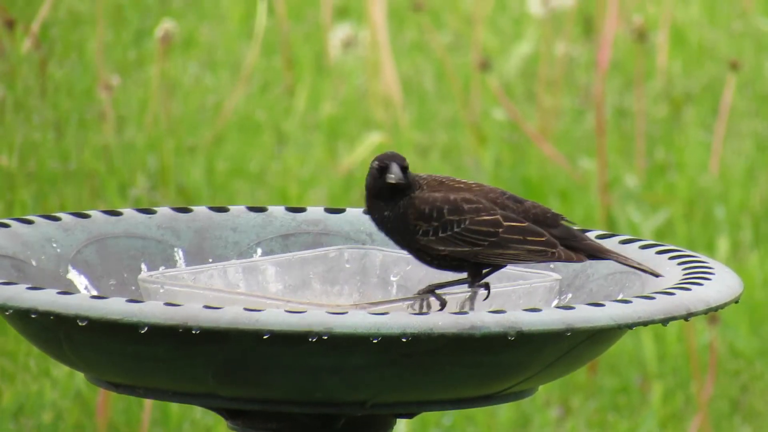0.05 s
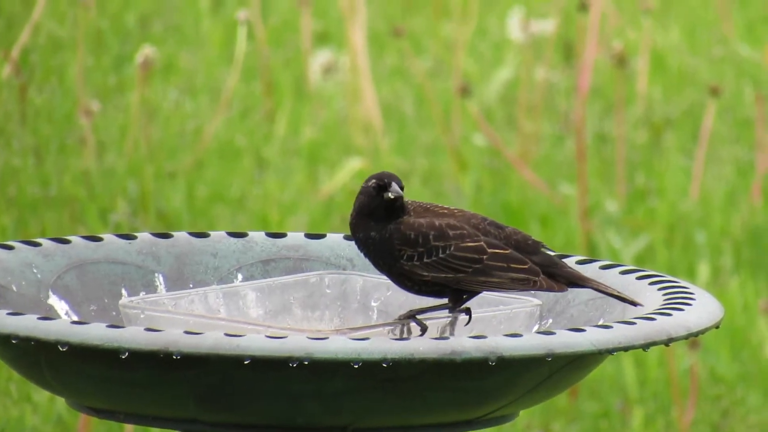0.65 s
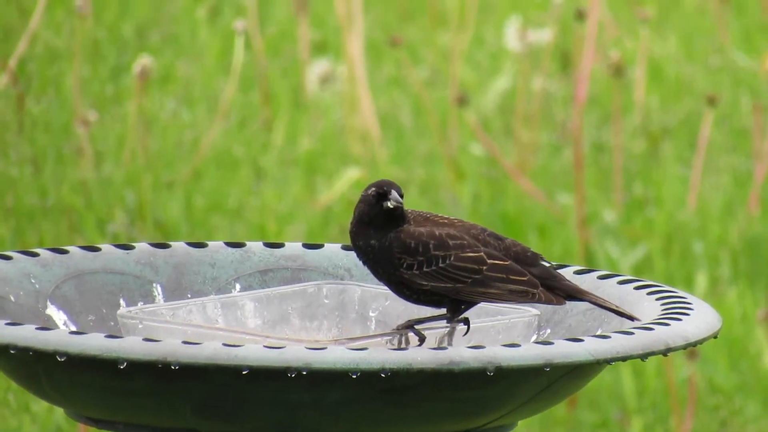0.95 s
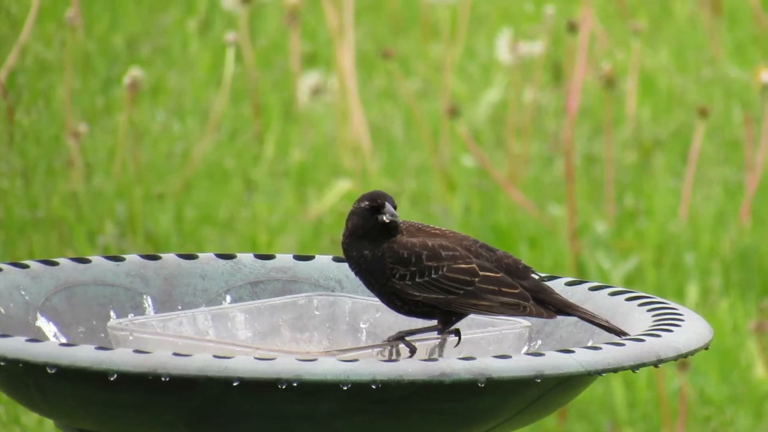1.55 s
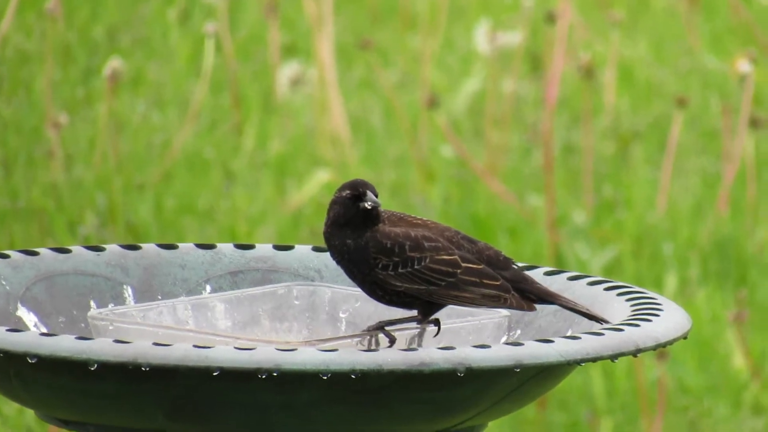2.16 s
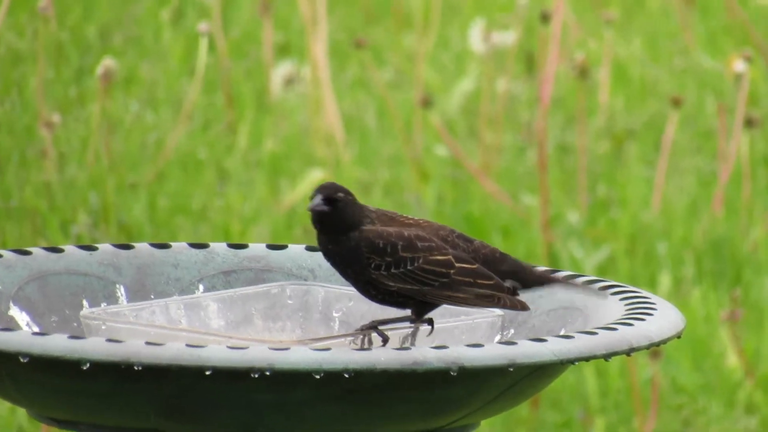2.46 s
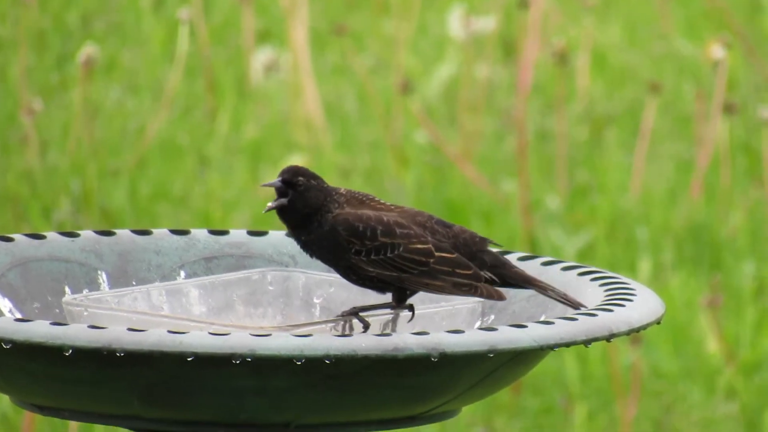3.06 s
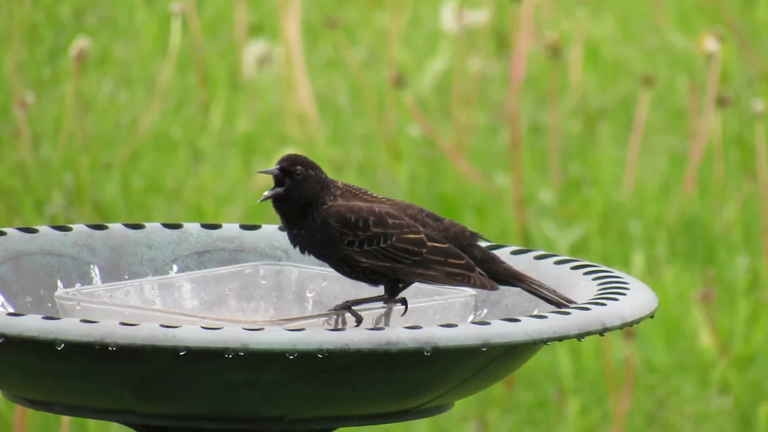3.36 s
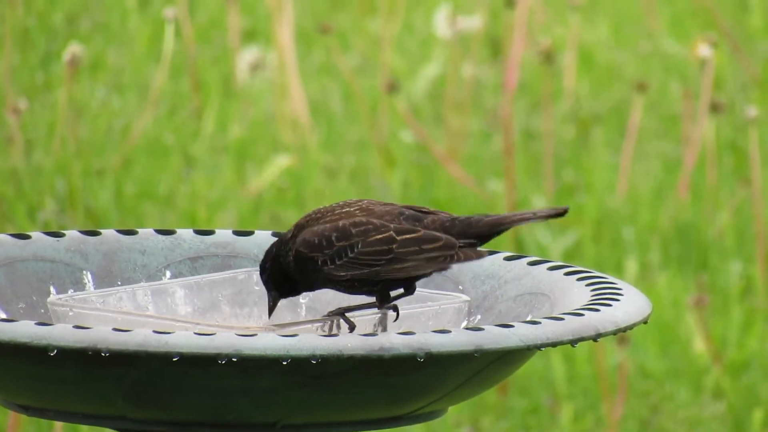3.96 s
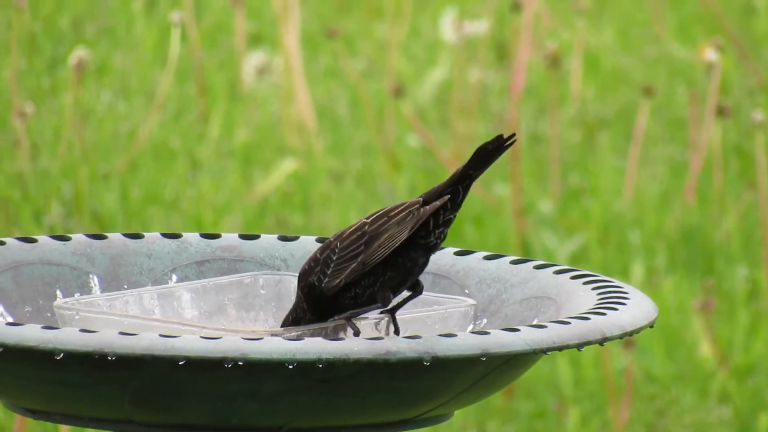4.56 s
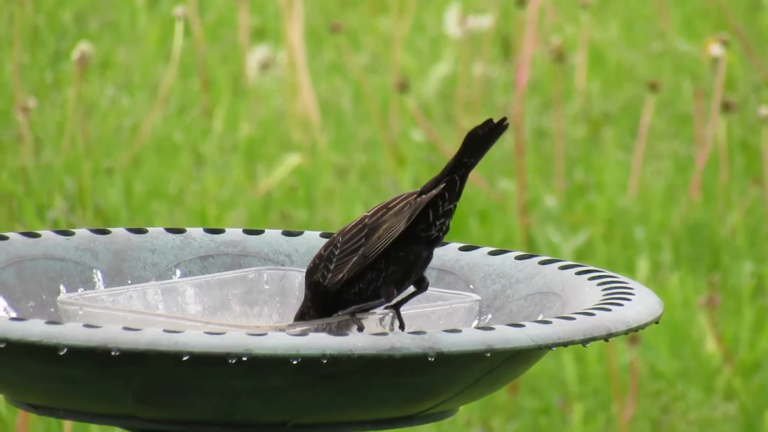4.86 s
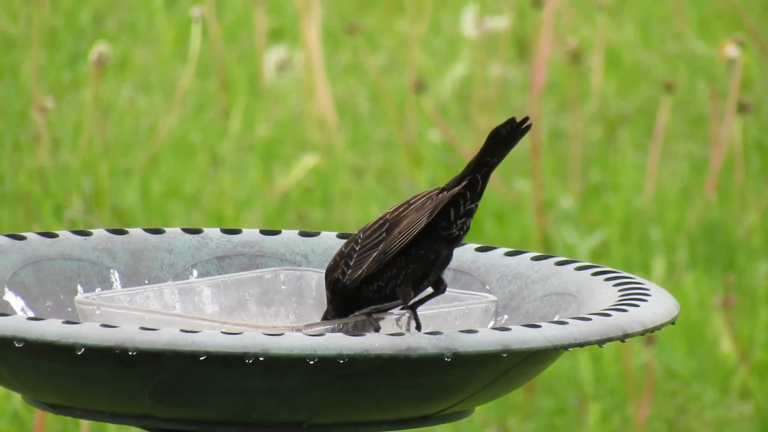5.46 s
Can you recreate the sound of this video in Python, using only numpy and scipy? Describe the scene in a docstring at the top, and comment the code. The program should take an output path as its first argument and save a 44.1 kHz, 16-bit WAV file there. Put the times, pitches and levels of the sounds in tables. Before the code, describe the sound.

Faint, thin chirps open over soft outdoor air while a far engine hums and swells. Then a blackbird on a bird bath, near the microphone, lets out a single high, buzzy whistle that falls and grows louder, finishing on a clean tone. Afterwards it dabbles very softly in the water as distant songbirds keep warbling in the garden trees.

```python
"""A garden with a bird bath. A distant engine drones and swells under a steady wash of outdoor air.
Songbirds warble and chip in the trees further off, and the garden echoes them.
On the bath a blackbird gives one loud whistle: its syrinx slides down in pitch while a fast flutter
makes it buzz, then the flutter stops and it ends on a pure note. Faint dabbles follow as it drinks."""
import sys
import numpy as np
from scipy import signal
from scipy.fft import rfft, irfft
from scipy.io import wavfile

SR = 44100
rng = np.random.default_rng(int(sys.argv[2]) if len(sys.argv) > 2 else 0)


def unload_wav(signal):
    """Save mono or channel-first audio to the path in sys.argv[1] as 16-bit WAV at rate SR, clipped to [-1, 1]."""
    wavfile.write(
        sys.argv[1],
        SR,
        np.round(np.clip(np.atleast_2d(signal).T, -1, 1) * 32767).astype(np.int16),
    )


N = 242991

TIME = np.arange(N) / SR
FREQ = np.maximum(np.arange(N // 2 + 1) * SR / N, 1)
SIDES = np.array([[1], [-1]])  # left, right


def undb(db):
    """Decibels to gain."""
    return 10 ** (np.asarray(db) / 20)


def curves(table):
    """Each column of a time table, joined by straight lines."""
    s, *columns = np.transpose(table)
    return [np.interp(TIME, s, c) for c in columns]


def colour(points):
    """A (Hz, dB) table on the frequency grid."""
    hz, db = np.transpose(points)
    return np.interp(np.log(FREQ), np.log(hz), db)


def walk(rate):
    """Smooth random modulation with spread 1 that changes about rate times a second."""
    y = irfft(rfft(rng.standard_normal(N)) / (1 + (FREQ / rate) ** 4), N)
    return y / y.std()


def ramp(start_s, length_s):
    """A straight fade in from start_s; a negative length fades out to it."""
    return np.clip((TIME - start_s) / length_s, 0, 1)


def bump(s, width_s):
    """A brief bell-shaped swell around time s."""
    return np.exp(-((TIME - s) / width_s) ** 2)


def delay(x, s):
    """The sound s seconds later."""
    return np.interp(TIME - s, TIME, x, left=0)


def add(track, s, sound):
    """Mix a short sound into a track at time s."""
    part = track[int(s * SR):][:len(sound)]
    part += sound[:len(part)]


def place(x, pan_db):
    """Put a sound to the left (+) or right (-)."""
    return x * undb(np.array([[pan_db], [-pan_db]]) / 2)


def garden(x, t60, build_s, side_db):
    """Stereo reverb: scatter from foliage and walls builds up, then dies away."""
    t = TIME[:SR * 3 // 2]
    tail = rng.standard_normal((2, len(t))) * undb(-60 * t / t60) * (1 - np.exp(-t / build_s))
    tail /= np.sqrt(np.sum(tail ** 2, axis=1, keepdims=True))
    mid, side = signal.fftconvolve(x[None], tail, axes=1)[:, :N]
    return mid + undb(side_db) * side * SIDES


# the low body of the outdoor air: (frequency [Hz], relative level [dB])
AIR_BODY = [(15, -68), (25, -17), (43, -35), (51, -9), (61, -7), (80, -5), (103, -9.5), (155, -11),
            (182, -15), (207, -16.5), (360, -18), (583, -25), (697, -33.5), (834, -23.5), (1800, -36),
            (2340, -45), (3960, -120)]
# its hiss: (frequency [Hz], density [dB per Hz])
AIR_HISS = [(1800, -101.5), (2300, -101), (3000, -104), (4000, -107), (6000, -109), (10000, -110),
            (12800, -110.5), (15000, -116)]
# its stereo width: (frequency [Hz], side minus mid [dB])
AIR_WIDTH = [(30, -5), (70, -18), (150, -3), (300, -1), (600, -5.5), (1200, -7), (3000, -5), (8000, 0),
             (14000, -1)]


def air():
    """The bed of outdoor air: a low wash with two narrow notches, under a smooth hiss."""
    wash = undb(colour(AIR_BODY)) / np.sqrt(1 + (FREQ / 2300) ** 6)
    for notch_hz, width_hz in [(700, 60), (77, 14)]:
        wash *= undb(-5 * np.exp(-((FREQ - notch_hz) / width_hz) ** 2))
    wash *= undb(-45.5) / np.sqrt(np.mean(wash ** 2 * (FREQ > 100)))  # set the level above 100 Hz
    hiss = undb(colour(AIR_HISS)) * np.sqrt(SR / 2)
    spectrum = np.hypot(wash, hiss)
    mid = irfft(rfft(rng.standard_normal(N)) * spectrum, N)
    side = irfft(rfft(rng.standard_normal(N)) * spectrum * undb(colour(AIR_WIDTH)), N)
    return place(mid + side * SIDES, pan_db=.3) * undb(.37 * walk(2.4))


# the engine's speed: (time [s], firing rate [Hz])
ENGINE_FIRING = [(0, 75.37), (2.4, 78.6), (4.1, 76.94), (4.85, 77.54), (5.51, 74.9)]
# its swells: (time [s], level [dB])
ENGINE_SWELLS = [(0.0, -62), (0.18, -43), (0.35, -49.5), (0.54, -43), (0.74, -51), (0.77, -42.5),
                 (0.97, -57.5), (1.67, -37.5), (1.73, -47.5), (1.95, -34), (2.1, -45.5), (2.33, -36.5),
                 (2.52, -41.5), (2.72, -34), (2.9, -41.5), (3.28, -34), (3.62, -48.5), (4.08, -34),
                 (4.37, -41), (4.83, -31), (4.94, -46.5), (5.05, -36.5), (5.46, -34), (5.51, -34)]


def engine():
    """A distant drone: the engine's firing note swells and fades over a faint, steadier octave."""
    hz = curves(ENGINE_FIRING)[0] + .497 * walk(4.45)
    phase = 2 * np.pi * np.cumsum(hz) / SR
    level_db = curves(ENGINE_SWELLS)[0] + .5 * walk(9.3)
    firing = np.sin(phase + .5 * SIDES) * undb(level_db)  # the phase offset widens it
    octave = np.sin(2 * phase) * undb(-56 + 2.3 * walk(3.7))
    return place(np.sqrt(2) * (firing + octave), pan_db=1)


def chirp(hz, db):
    """A pure note on a pitch contour, swelling and fading."""
    swell = np.abs(np.sin(np.linspace(0, np.pi, len(hz)))) ** .6
    return undb(db + 5.5) * swell * np.sin(2 * np.pi * np.cumsum(hz) / SR)


def sing(notes, bend=2.6, db_per_octave=22.5):
    """Notes that each slur between two pitches, steepest and loudest at the high end."""
    song = np.zeros(N)
    for s, length, from_hz, to_hz, db in notes:
        height = np.linspace(from_hz > to_hz, from_hz <= to_hz, int(length * SR)) ** bend
        hz = min(from_hz, to_hz) + abs(to_hz - from_hz) * height
        add(song, s, chirp(hz, db + db_per_octave * np.log2(hz / hz.mean())))
    return song


# how the furthest birds rise in the mix: (time [s], level [dB])
CHORUS_FADER = [(0, -77.5), (2.0, -70.5), (2.7, -66.5), (3.3, -54.5), (4.2, -60), (4.5, -56), (5.5, -59.5)]


def chorus():
    """Many far birds, fully wet: their notes arrive only as scatter."""
    notes = []
    for when, length, pitch, start, end in rng.random((140, 5)):
        from_hz, to_hz = 2150 + 850 * pitch + 350 * (np.array([start, end]) - .5)
        notes.append((when * TIME[-1], .0313 + .0586 * length, from_hz, to_hz, 0))
    wash = garden(sing(notes), t60=.79, build_s=.018, side_db=-15.5)
    return wash / wash.std() * undb(curves(CHORUS_FADER)[0])


# a small bird's thin calls: (time [s], length [s], from [Hz], to [Hz], relative level [dB])
THIN_PIPS = [(.16, 0.038, 4210, 4070, -70), (.84, 0.032, 6600, 6900, -77), (.942, .018, 5300, 5600, -73),
             (1.06, 0.034, 5420, 5470, -65), (1.19, .028, 5660, 5400, -68), (1.32, 0.027, 5650, 5500, -80),
             (1.89, .06, 4900, 4250, -75), (2.02, .027, 5800, 5100, -80)]
# its run of chips: (time [s], relative level [dB])
CHIP_CUES = [(0.961, -70), (1.086, -65.5), (1.215, -63.5), (1.352, -73), (1.492, -74), (1.625, -73),
             (1.766, -72), (1.906, -68), (2.048, -67)]
# one chip holds, drops and levels out: (time into the chip [s], pitch [Hz])
CHIP_PITCH = [(0, 4120), (0.013, 4194), (.021, 3250), (.04, 3050)]


def small_bird():
    """Thin pips and a run of falling chips, blurred by the bush they come from."""
    song = sing(THIN_PIPS)
    s, hz = np.transpose(CHIP_PITCH)
    contour = np.interp(np.arange(0, s[-1], 1 / SR), s, hz)
    for start, db in CHIP_CUES:
        add(song, start, chirp(contour, db))
    song *= undb(2.5 * walk(150))  # a fast flicker roughens the notes
    bush = undb(-1) * garden(song, t60=.2, build_s=.005, side_db=-8)
    return undb(1.3) * (song + bush)


# a phrase from the trees: (time into it [s], length [s], from [Hz], to [Hz], relative level [dB])
TREE_PHRASE = [(0, .07, 2860, 2737, -56), (.098, .066, 2346, 2285, -52), (.388, 0.088, 3700, 1880, -53.5),
               (.474, 0.087, 2394, 3293, -51.5), (.555, 0.065, 2586, 2170, -53.5),
               (.879, .056, 3540, 3010, -47.5), (.981, 0.04, 2480, 2100, -53),
               (1.015, 0.083, 2200, 2004, -59.5), (1.079, 0.073, 2404, 2245, -51.5)]
# each time it is sung: (time [s], gain [dB])
PHRASE_CUES = [(2.763, -3.5), (4.245, -4.5)]
# single slurs from neighbours: (time [s], length [s], from [Hz], to [Hz], relative level [dB])
STRAY_SLURS = [(2.16, 0.12, 3180, 2580, -63), (2.255, 0.088, 2520, 2120, -66),
               (2.325, .06, 2240, 2950, -62.5), (2.375, 0.051, 3020, 2980, -59.5),
               (2.695, 0.083, 2350, 2500, -65.5), (2.736, 0.023, 2500, 1960, -67),
               (2.915, 0.079, 2790, 2755, -63.5), (3.02, 0.14, 2280, 2063, -66.5),
               (3.555, 0.044, 3080, 2610, -53.5), (3.646, 0.048, 2540, 1900, -56.5),
               (3.801, 0.041, 3260, 3140, -58), (3.845, 0.0398, 2666, 3120, -52),
               (3.881, .013, 2030, 1740, -54), (3.927, 0.028, 2950, 3090, -54),
               (4.164, 0.031, 3140, 3380, -62.5), (4.188, .035, 2400, 2900, -64),
               (4.22, .09, 2930, 2560, -55.5), (4.299, 0.024, 3000, 3200, -52),
               (4.454, 0.054, 3280, 3460, -63.5), (4.838, .022, 2550, 2980, -56),
               (4.9, 0.0305, 2900, 2450, -59.5)]


def songbirds():
    """A repeated phrase and stray slurs from the trees, broken up by leaves, with a long tail."""
    phrase = sing(TREE_PHRASE)
    song = sing(STRAY_SLURS) + sum(undb(db) * delay(phrase, s) for s, db in PHRASE_CUES)
    song *= undb(1.5 + 3 * walk(53))
    leaves = undb(-8) * garden(song, t60=.17, build_s=.006, side_db=-10)
    tail = undb(-6.5) * garden(song, t60=1, build_s=.04, side_db=-12)
    return place(song + leaves + tail, pan_db=2.5)


# ticks and dabbles at the bath: (time [s], length [s], centre [Hz], width [Hz], relative level [dB])
BATH_DABBLES = [(3.874, 0.025, 5000, 1210, -68), (4.608, 0.1, 3940, 600, -67.5),
                (4.838, 0.067, 4170, 500, -67.5), (4.876, 0.062, 4560, 900, -70.5)]


def dabbles():
    """Soft bursts of narrow-band noise as the blackbird bends to drink."""
    track = np.zeros(N)
    for s, length, hz, width_hz, db in BATH_DABBLES:
        t = TIME[:int(length * SR)]
        grain = walk(width_hz / 2)[:len(t)] * np.sin(2 * np.pi * hz * t)
        add(track, s, 2 * undb(db) * grain * np.sin(np.pi * t / length))
    return place(track, pan_db=2)


WHISTLE_START_S, WHISTLE_END_S = 2.905, 3.614


def settle(first, last, time_s):
    """A value that relaxes from first to last once the whistle starts."""
    return last + (first - last) * np.exp(-np.maximum(TIME - WHISTLE_START_S, 0) / time_s)


# the whistle's downward slide: (time [s], pitch [Hz])
WHISTLE_SLIDE = [(2.905, 4885), (3.16, 4410), (3.225, 4240), (3.27, 4250), (3.42, 3910), (3.566, 3665),
                 (3.605, 3610), (3.635, 3530)]


def syrinx(attack_s=.013, release_s=.024):
    """A sliding whistle whose flutter swings the pitch and pulses the airflow; gives core, overtones."""
    age = np.clip(TIME, WHISTLE_START_S, WHISTLE_END_S) - WHISTLE_START_S
    gate = ramp(WHISTLE_START_S, attack_s) * np.exp(-np.maximum(TIME - WHISTLE_END_S, 0) / release_s)
    effort = np.sqrt(2) * gate * undb(-47 + 26.5 * age)  # the bird pushes harder all through the note
    slide_hz = curves(WHISTLE_SLIDE)[0] + settle(1424, 0, time_s=.032)  # it starts sharp
    # the flutter sets in after the attack and stops short of the end, leaving a pure tone
    buzz = ramp(2.919, .016) * ramp(3.566, -.016)
    # it starts fast and wide, then settles
    flutter_hz = settle(168.8, 135.8, time_s=.22) * (1 + .015 * walk(50))
    swing_hz = buzz * settle(480, 70, time_s=.18)
    flutter = 2 * np.pi * np.cumsum(flutter_hz) / SR
    # the pitch rests low and flicks upward once a cycle, never twice alike
    flick = np.sin(flutter) - .3 * np.cos(2 * flutter)
    flick = flick * (1 + .2 * walk(90)) + .16 * walk(350)
    pitch_hz = slide_hz + swing_hz * flick + 4 * walk(60)
    phase = 2 * np.pi * np.cumsum(pitch_hz) / SR
    # the airflow dips with each flick
    depth = .58 * buzz
    flow = (1 - depth * np.sin(flutter + 1.23)) / np.sqrt(1 + depth ** 2 / 2)
    flow *= undb(2.9 * depth * walk(76))
    # the core of the note catches once, then bursts back
    catch_s, rebound_s, width_s = 3.39, .038, .0069
    catch = undb(-12.5 * bump(catch_s, width_s) + 5.5 * bump(catch_s + rebound_s, width_s))
    core = catch * flow * np.sin(phase)
    # the overtones swing wider and rasp; the second rises with the flutter, the upper two with effort
    rasp = depth * (.2 * walk(500) - .75 * np.cos(flutter))
    second_db = np.interp(buzz, [0, 1], [-29, -18.5])
    third_db = -23 + age
    overtones = sum(undb(db) * np.sin(k * (phase + rasp)) * (k * slide_hz < .4 * SR)
                    for k, db in enumerate([second_db, third_db, third_db - 11.5], 2))
    late_onset = gate * undb(settle(-23, 0, time_s=.029))  # they speak later than the core
    return effort * core, effort * overtones * flow ** .44 * late_onset


# early reflections of the whistle: (delay [s], level [dB])
EARLY_REFLECTIONS = [(.0046, -19), (.0173, -18), (.0335, -17), (.052, -21)]


def blackbird():
    """The whistle up close, thrown back by the bath, the grass, the bushes and the trees."""
    core, overtones = syrinx()
    voice = core + overtones
    early = sum(undb(db) * delay(voice, s) for s, db in EARLY_REFLECTIONS)
    # the beak beams the overtones away, so more of them arrive by way of the basin and the grass
    grass = undb(1) * garden(overtones, t60=.13, build_s=.0059, side_db=-5.5)
    bushes = undb(-13) * garden(voice, t60=.26, build_s=.01, side_db=-6)
    trees = undb(-21) * garden(voice, t60=.95, build_s=.04, side_db=-8)
    return place(voice + early + grass + bushes + trees, pan_db=1)


def scene():
    """The mix: the blackbird in front, other birds behind it, engine and air underneath."""
    return blackbird() + dabbles() + songbirds() + small_bird() + chorus() + engine() + air()


def record(dry):
    """A steep low-pass takes off the very top."""
    top_hz = 15100
    return signal.sosfilt(signal.ellip(10, .2, 80, top_hz, fs=SR, output="sos"), dry)


dry = scene()
out = record(dry)
unload_wav(out)
```